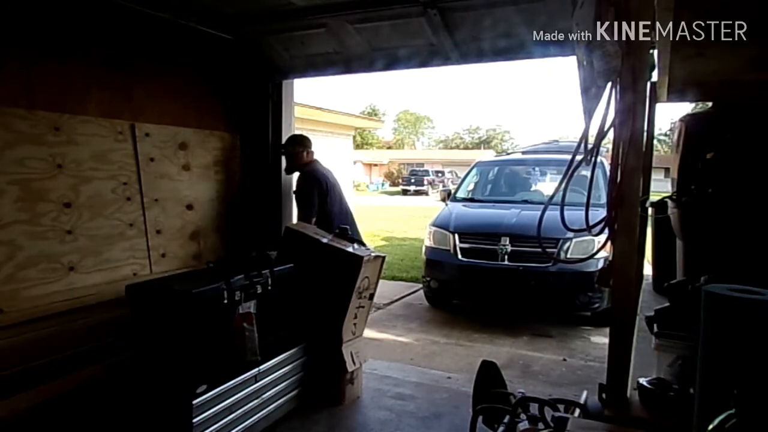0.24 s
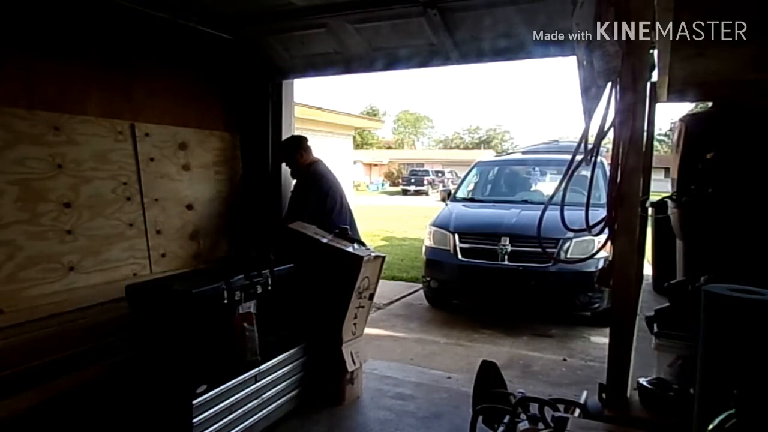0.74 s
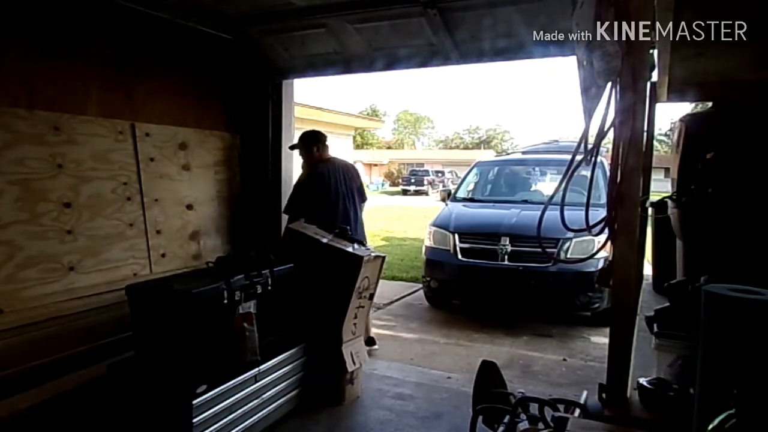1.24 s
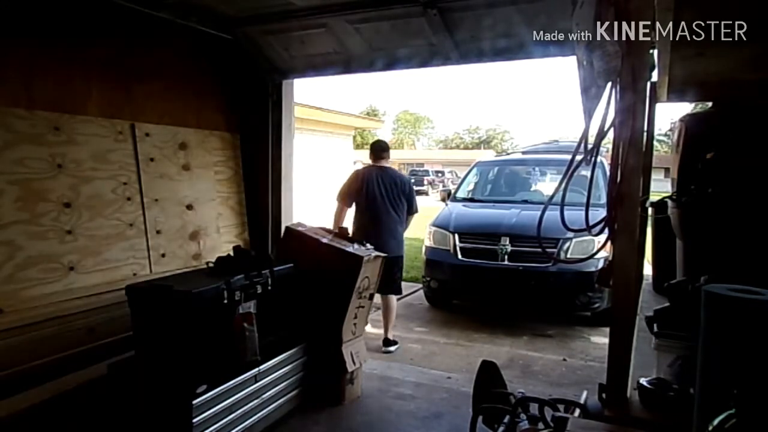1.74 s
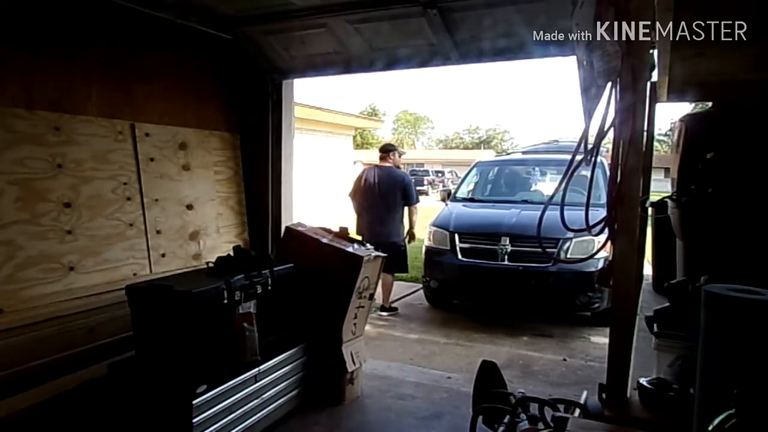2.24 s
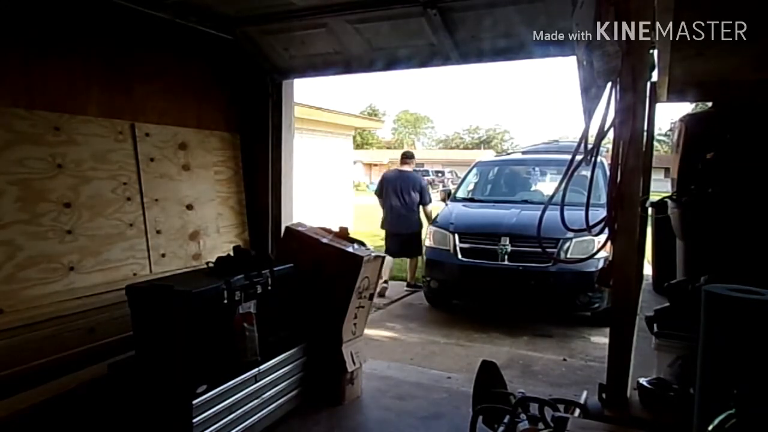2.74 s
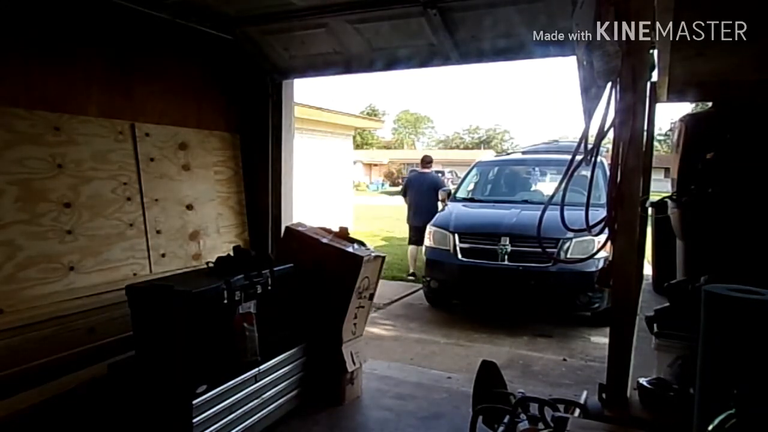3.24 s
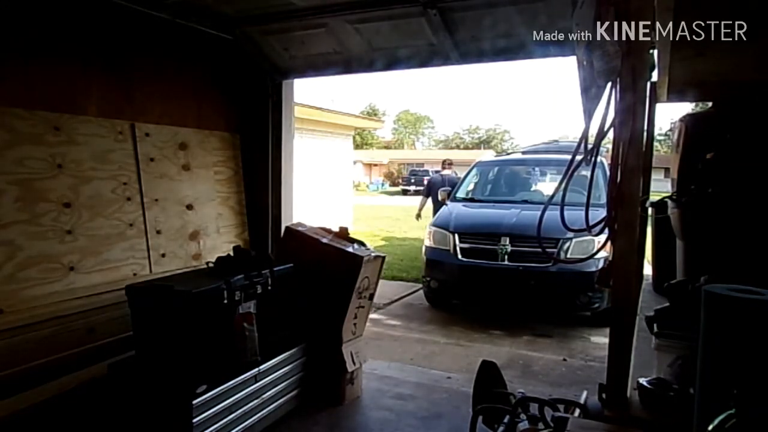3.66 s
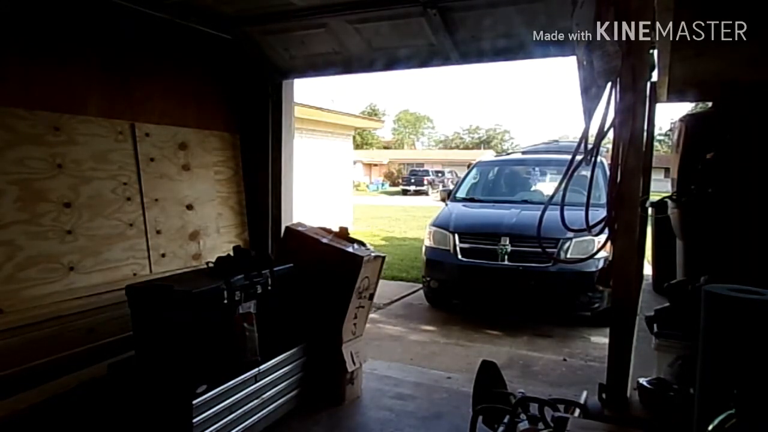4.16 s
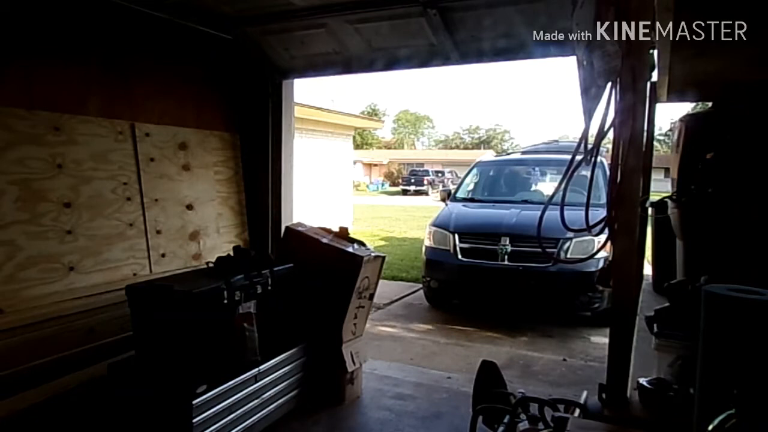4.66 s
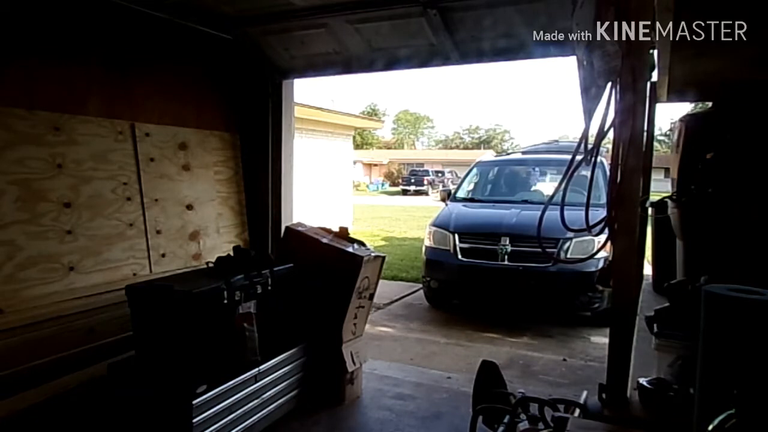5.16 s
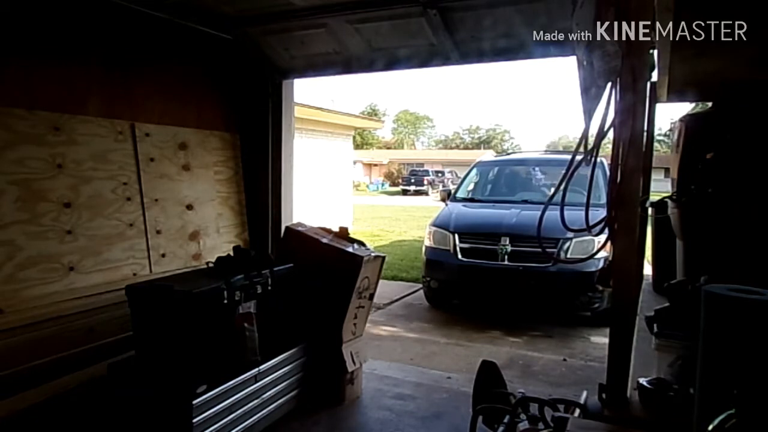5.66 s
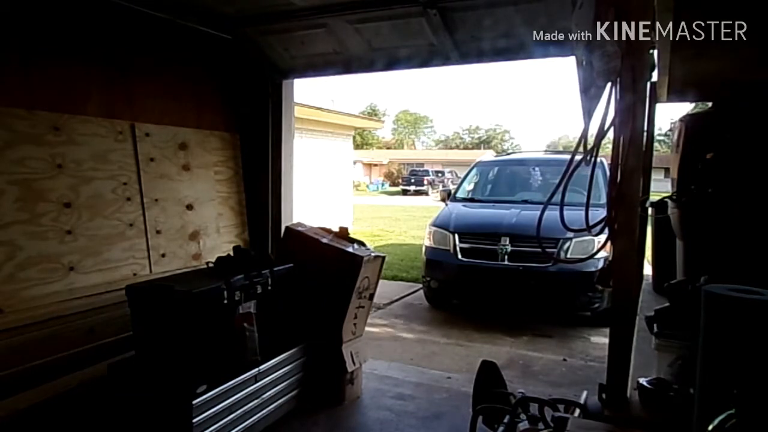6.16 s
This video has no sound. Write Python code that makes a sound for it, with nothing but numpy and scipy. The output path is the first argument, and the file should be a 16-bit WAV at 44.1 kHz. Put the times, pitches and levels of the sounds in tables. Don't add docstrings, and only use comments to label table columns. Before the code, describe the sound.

A bare open garage beside a driveway, heard through a small close microphone, with a faint low neighbourhood hum and thin hiss throughout. From 0 to 2.6 seconds, activity is quiet: a light double wood knock at 0.7, a long soft drag from 0.8, gritty shoe scuffs and ticks around 1.1 to 1.8, then a dull drag near 2.05. At 2.8 a board strikes hard, with a bright woody ring, some crack and a quarter-second of room reverberation. Small scuffs and taps return, clearest at 3.5, with a soft drag near 4. At 4.5 comes a softer, darker board knock without crack, followed by a dull drag. At 5.2 the heaviest blow lands, sharp, rattling and distorted, with a low slab thump. A light knock follows at 5.4, then sparse faint scuffs and ticks until about 6.3.

```python
import sys
import numpy as np
from scipy import signal
from scipy.fft import rfft, irfft
from scipy.io import wavfile
from scipy.ndimage import uniform_filter1d

SR = 44100
rng = np.random.default_rng(int(sys.argv[2]) if len(sys.argv) > 2 else 0)


def digitize_waveform(pressure):
    field = np.atleast_2d(pressure).T
    bounded = np.clip(field, -1, 1)
    quanta = np.round(bounded * 32767).astype(np.int16)
    wavfile.write(sys.argv[1], SR, quanta)


def makeup_ratio(level_db):
    decades = np.asarray(level_db, float) / 20
    return 10 ** decades


N = 282240


def lookup(table, hz):
    f, v = np.transpose(table)
    return np.interp(np.log(np.maximum(hz, 1)), np.log(f), v)


def noise(size):
    return rng.standard_normal(size)


def colour(x, table):
    gain = makeup_ratio(lookup(table, np.fft.rfftfreq(len(x), 1 / SR)))
    y = irfft(rfft(x) * gain, len(x))
    return y / np.sqrt(np.mean(y ** 2))


def bands(x):
    spec = rfft(x)
    octave = np.log2(np.fft.rfftfreq(len(x), 1 / SR) + 1)
    for hz in 2 ** np.arange(4, 14.6, .5):
        weight = np.clip(1 - 2 * abs(octave - np.log2(hz)), 0, 1)
        yield hz, irfft(spec * weight, len(x))


def walk(rate):
    k = int(SR / rate)
    held = np.repeat(noise(N // k + 1), k)
    return 1.2 * uniform_filter1d(uniform_filter1d(held, k), k)[:N]


def clumps(size, db):
    held = np.repeat(noise(size // 100 + 1), 100)[:size]
    return makeup_ratio(db * uniform_filter1d(held, size=80))


def fade(t, t60, rise):
    return (1 - np.exp(-(t / max(rise, 1e-4)) ** 2)) * makeup_ratio(-60 * t / t60)


def release(t, hold, t60):
    return makeup_ratio(-60 * np.maximum(t - hold, 0) / t60)


def add(out, s, x):
    i = int(s * SR)
    out[i:i + len(x)] += x[:N - i]


def dull(x):
    port_hz = 7700
    return signal.sosfilt(signal.cheby2(6, 40, 1.15 * port_hz, fs=SR, output="sos"), x)


def boards():
    # (time [s], peak [dB], crack [dB], rise [s], rattle [s])
    blows = [
        (2.78, -6.5, -16, 0.0024, 0.018),
        (4.5155, -12, -70, 0.0042, 0.0038),
        (5.182, -6, 2.5, 0.00084, 0.03),
    ]
    # (frequency [Hz], level [dB], t60 [s])
    board_modes = [
        [(500, -34, 0.17), (628, -40, 0.084), (840, 6, 0.092), (1011, 5, 0.083), (1247, -2.5, 0.34),
         (1395, -8.5, .15), (1724, -2, 0.45), (1857, 5.5, 0.12), (2060, 2.5, .2), (2230, 0.5, 0.05),
         (2828, 0, 0.3), (2960, 4.5, 0.078)],
        [(593, 5.5, 0.27), (762, 4, 0.18), (874, -8, .14), (1028, 5, 0.11), (1088, 0.5, 0.31),
         (1214, -10.5, .2), (1794, -23, .2)],
        [(818, -9.5, 0.14), (991, -2, 0.22), (1226, -10.5, 0.051), (1278, -13, 0.08), (1356, -2.5, 0.32),
         (1526, 0.5, 0.23), (1917, -7, 0.12), (2300, -11.5, .13), (2270, -1.5, 0.06), (2658, -1, 0.15),
         (3270, -15, .15), (3260, -8.5, 0.089)],
    ]
    # (frequency [Hz], level [dB per Hz])
    room_tints = [
        [(35, -58), (60, -23), (150, -13), (280, -12), (420, -10), (800, -3), (1300, -4), (2000, -4),
         (3000, -11), (4000, -22.5), (6500, -37.5), (9000, -47)],
        [(30, -62), (60, -18), (200, -13), (450, -11.5), (600, -5.5), (800, -7.5), (1050, -6), (1500, -13.5),
         (3000, -28), (4500, -39), (6800, -44), (9000, -56)],
        [(35, -58.5), (60, -25.5), (150, -22.5), (280, -11), (600, -7.5), (1100, -2.5), (1700, -2),
         (3000, -5.5), (4000, -13.5), (5000, -28), (6800, -33.5), (9000, -50.5)],
    ]
    tremor_tint = [(200, -12.0), (900, -2.5), (2500, -11), (5000, -23.5)]
    out, t = np.zeros(N), np.arange(SR // 50) / SR
    for (s, db, crack_db, rise, rattle_s), modes, tint in zip(blows, board_modes, room_tints):
        add(out, s - .0015, makeup_ratio(db - 4.0) * blow(modes, tint, crack_db, rise, rattle_s))
        tremor = colour(noise(len(t)), tremor_tint) * fade(t, .05, .002)
        add(out, s - .006, makeup_ratio(db - 19 + .3 * crack_db) * dull(tremor))
    return out


def blow(modes, tint, crack_db, rise, rattle_s):
    # (frequency [Hz], t60 [s])
    garage = [(60, 0.11), (250, 0.31), (600, 0.29), (1200, 0.26), (2500, 0.23), (3600, 0.24)]
    crack_tint = [(2500, -22.5), (5000, -14.5), (7000, -9), (8400, 0.5), (9800, -16.5),
                  (14000, -17.0), (16000, -30)]
    longest_s, cycles = .21, 380
    t = np.arange(SR // 2) / SR

    ring = np.zeros(len(t))
    for (hz, db, t60), phase in zip(modes, rng.uniform(0, 2 * np.pi, 12)):
        tone = np.sin(2 * np.pi * hz * t + phase)
        ring += makeup_ratio(db) * tone * fade(t, min(t60, longest_s, cycles / hz), rise)

    room = np.zeros(len(t))
    for hz, band in bands(colour(noise(len(t)), tint)):
        room += band * clumps(len(t), 4.0) * fade(t, lookup(garage, hz), rise + .8 / hz)

    rattle = makeup_ratio(6 * np.exp(-(t / rattle_s) ** 6))
    body = (makeup_ratio(-7.5) * ring + makeup_ratio(-1.5) * room) * rattle
    crack = colour(noise(len(t)), crack_tint) * fade(t, .016, .0009) * np.exp(-(t / .012) ** 2)
    return dull(body) + makeup_ratio(crack_db + 9) * crack


def taps():
    # (time [s], peak [dB], centre [Hz], width [octaves])
    ticks = [(0.0408, -38, 2200, 1), (0.6988, -39.5, 2186, 0.91), (0.9168, -46.5, 2480, 1),
             (1.0081, -41.5, 2540, 0.67), (1.0974, -39, 3320, .9), (1.2146, -36.5, 3220, 1),
             (1.3713, -42, 3170, .6), (1.4032, -44, 2610, 0.93), (1.4401, -35, 2224, 0.78),
             (1.6661, -37, 2830, 1), (1.666, -43, 1575, 1), (1.8018, -46, 3410, 1),
             (3.4161, -50.5, 1930, .9), (3.526, -39, 3290, 1), (4.0382, -47, 2900, 0.98),
             (5.4116, -39, 2910, 0.35), (5.5593, -56.5, 2700, 0.94), (6.2294, -51.5, 3330, 1)]
    # (time [s], peak [dB], centre [Hz], width [octaves])
    knocks = [(0.04, -49, 600, .8), (0.698, -34.5, 1016, 0.77), (0.713, -26.5, 643, 1),
              (0.718, -27, 392, 1), (0.799, -34, 247, .6), (0.95, -42, 230, 0.79), (1.651, -35, 249, 0.66),
              (3.549, -34.5, 630, 0.53), (3.56, -36, 278, 0.34), (3.792, -35.5, 547, .45),
              (4.468, -42.5, 608, 0.73), (5.412, -27.5, 283, 0.73), (5.413, -29.5, 756, 0.8),
              (6.334, -41, 263, 0.37)]
    # (time [s], peak [dB], centre [Hz], width [octaves])
    thuds = [(0.714, -34, 103.7, 0.86), (.76, -41, 150, 0.82), (.88, -39, 140, 0.64),
             (1.11, -41, 150, 0.76), (1.165, -40, 170, .7), (1.699, -40.5, 148, 0.66),
             (2.219, -47.5, 117, 0.85), (2.38, -46, 140, .7), (2.869, -38, 60, .7), (3.559, -51, 88.8, .7),
             (5.429, -37.5, 57, .6)]
    # (time [s], peak [dB], centre [Hz], width [octaves])
    thumps = [
        (5.183, -16, 102, .8),
    ]
    kinds = ((ticks, 0.16, 0.01), (knocks, 0.15, 0.011), (thuds, 0.14, 0.026), (thumps, .09, .006))
    out, t = np.zeros(N), np.arange(SR // 3) / SR
    for rows, t60, hold in kinds:
        for s, db, hz, width in rows:
            spread = 2 ** max(width, .4)
            tint = [(hz / spread ** 2, -24), (hz / 1.3, -7), (hz, 0), (hz * 1.3, -6),
                    (hz * spread, -10), (hz * spread ** 2, -19), (hz * spread ** 4, -50)]
            rustle = colour(clumps(len(t), 2.2) * noise(len(t)), tint)
            note = makeup_ratio(-8.5) * np.sin(2 * np.pi * hz * t) * clumps(len(t), 2.2)
            shape = fade(t, 9, .0012 + .4 / hz) * release(t, hold, t60)
            add(out, s - .002, makeup_ratio(db - 9.5) * (rustle + note) * shape)
    return dull(out)


def scuffs():
    # (start [s], held [s], coarse grit [dB], fine grit [dB above coarse])
    shoe_scuffs = [(0.56, .04, -65, -7), (0.91, 0.066, -57.5, -2.5), (1.073, 0.062, -48, -7),
                   (1.2, .025, -53, -11), (1.34, 0.053, -57.5, -5), (1.6, 0.012, -72, 1),
                   (1.735, 0.036, -62.5, -4), (1.79, 0.043, -62, -4.5), (2.6, 0.048, -63, -19),
                   (3.0, 0.021, -65.5, -4.5), (3.38, 0.038, -70.5, 4), (3.525, 0.033, -45, -7),
                   (3.88, 0.025, -60.5, -12.5), (4.0, 0.04, -56.5, -4), (4.2, 0.032, -66, -1),
                   (4.435, .035, -57, -5.5), (4.55, .04, -58, -4), (5.54, 0.016, -66, -8),
                   (5.76, .04, -69.5, -4), (6.08, .015, -80, -1), (6.21, 0.024, -73, -4)]
    # (start [s], held [s], coarse grit [dB], fine grit [dB above
    # coarse], dull rub [dB above coarse])
    drags = [
        (0.1, 0.4, -72, -4.5, 4.5),
        (0.8, 0.31, -57, -7, 4),
        (1.72, 0.17, -66.5, -9, 10.5),
        (2.05, 0.23, -57.5, -16.5, 4),
        (3.2, .1, -74.5, 4.5, 2),
        (3.95, 0.16, -61, -9.5, 6.5),
        (4.55, 0.22, -57, -13.5, 6),
    ]
    stir_db = [-69, -87, -59.5]
    # (frequency [Hz], level [dB per Hz])
    coarse_tint = [(600, -26), (1200, -1), (2300, -1.5), (3400, -2), (4200, -8), (5200, -29.5), (9000, -73)]
    # (frequency [Hz], level [dB per Hz])
    fine_tint = [(2500, -32.5), (4000, -3), (6000, 1.5), (7000, -3), (8000, -19), (9000, -18),
                 (11500, -33.5), (14900, -23), (17000, -27.5)]
    # (frequency [Hz], level [dB per Hz])
    sole_tint = [(25, -22), (50, -9.5), (110, -2), (280, 10.5), (450, -1), (650, 5.5), (1200, -3),
                 (2000, -42.5)]
    sole_db = -0.6
    power = makeup_ratio(np.array(stir_db))[:, None] ** 2
    power = power + slides([(*row, sole_db) for row in shoe_scuffs], rise=0.018, t60=.22)
    power = power + slides(drags, rise=0.099, t60=1)
    coarse, fine, sole = np.sqrt(power)
    grains = noise(N) * makeup_ratio(2.1 * rng.exponential(size=N) + 1.5 * walk(60))
    rub = noise(N) * makeup_ratio(2.5 * walk(58))
    return coarse * colour(grains, coarse_tint) + fine * colour(grains, fine_tint) + sole * colour(rub, sole_tint)


def slides(rows, rise, t60):
    t, powers = np.arange(N) / SR, np.zeros((3, N))
    for s, held, db, fine_db, sole_db in rows:
        since = np.maximum(t - s, 0)
        shape = (1 - np.exp(-(since / rise) ** 2)) * release(since, rise + held, t60)
        levels = makeup_ratio(db + np.array([[0], [fine_db], [sole_db]]))
        powers += (shape * levels) ** 2
    return powers


def snaps():
    # (time [s], peak [dB])
    grain_snaps = [(.041, -78), (.6, -81), (.7, -79), (1.215, -73), (1.36, -73), (1.395, -74), (1.44, -77),
                   (1.666, -79), (1.755, -78), (2.2, -79), (3.416, -77), (4.52, -75), (4.55, -78),
                   (6.229, -76)]
    # (frequency [Hz], level [dB per Hz])
    snap_tint = [(6000, -33), (8600, 1), (10500, -14), (12000, -12), (14500, -5), (16500, -7)]
    out, t = np.zeros(N), np.arange(SR // 8) / SR
    shape = fade(t, 9, .002) * release(t, .012, .1)
    for s, db in grain_snaps:
        add(out, s, makeup_ratio(db) * colour(noise(len(t)), snap_tint) * shape)
    return out


def hum():
    # (frequency [Hz], level [dB per Hz])
    air_tint = [(12, -41.5), (30, -13), (60, -11.5), (250, 1.5), (500, -7), (780, -8.5), (1760, -21),
                (2600, -20.5), (4000, -31), (6600, -31.5), (7700, -51), (8800, -46.5), (11000, -63),
                (13000, -51), (16000, -52)]
    swell, air = walk(1.0), np.zeros(N)
    for hz, band in bands(colour(noise(N), air_tint)):
        air += band * makeup_ratio(1.1 * swell + 0.4 * walk(14))
    whine_hz = 12900 + 25 * walk(80)
    whine = np.sin(2 * np.pi * np.cumsum(whine_hz) / SR)
    return makeup_ratio(-54) * air + makeup_ratio(-93) * whine


def scene():
    return (boards() + taps() + scuffs() + snaps() + hum())[None]


def band_limit(x):
    return signal.sosfilt(signal.butter(12, 16560, fs=SR, output="sos"), x)


def record(dry):
    # (frequency [Hz], width [Hz], gain [dB])
    dips = [(3700, 130, -7), (4430, 130, -11), (8150, 250, -9), (11800, 200, -8)]
    top_hz, clip = 15700, .49
    hz = np.fft.rfftfreq(N, 1 / SR)
    housing_db = sum(db * np.exp(-((hz - f) / w) ** 2) for f, w, db in dips)
    x = irfft(rfft(dry) * makeup_ratio(housing_db), N)
    x = signal.sosfilt(signal.ellip(8, .3, 45, top_hz, fs=SR, output="sos"), x)
    x = np.clip(x, -clip, clip)
    x = signal.sosfilt(signal.butter(8, 1.02 * top_hz, fs=SR, output="sos"), x)
    return band_limit(x)


dry = scene()
out = record(dry)
digitize_waveform(out)
```